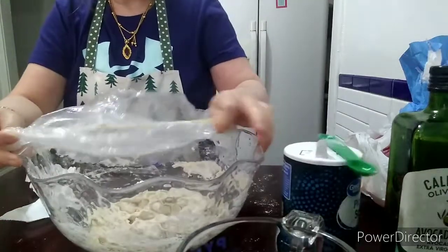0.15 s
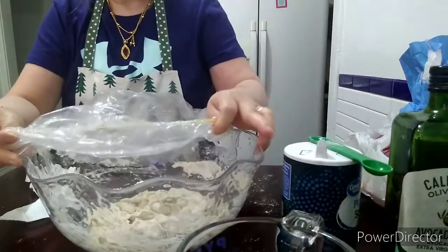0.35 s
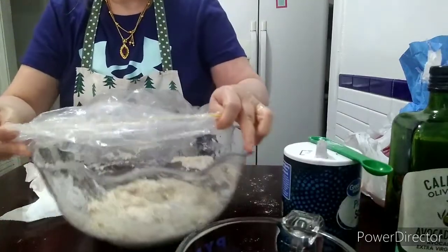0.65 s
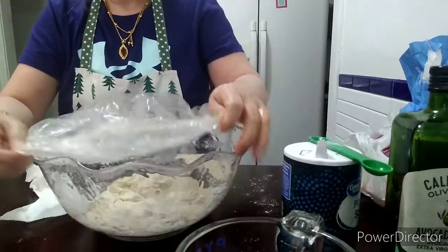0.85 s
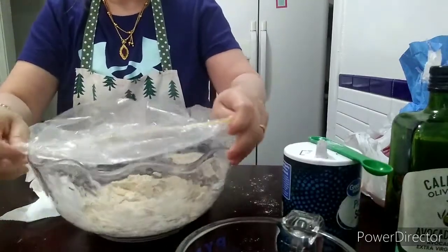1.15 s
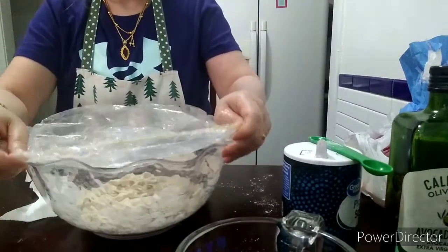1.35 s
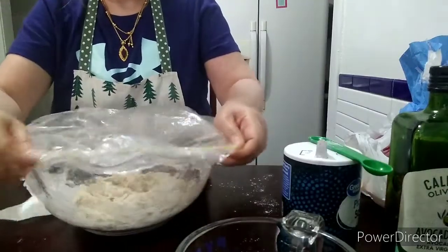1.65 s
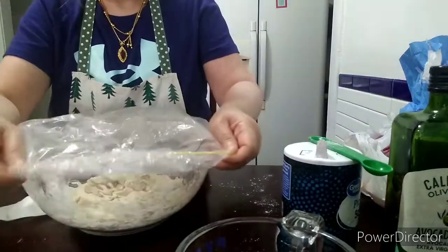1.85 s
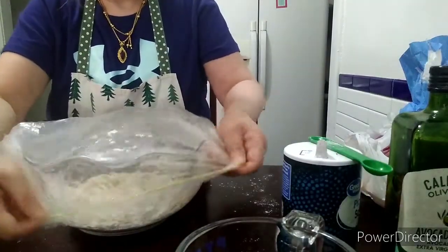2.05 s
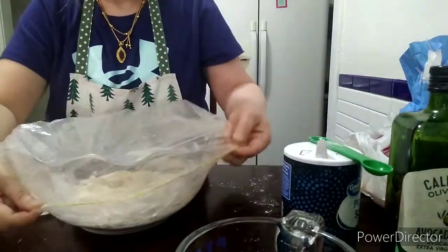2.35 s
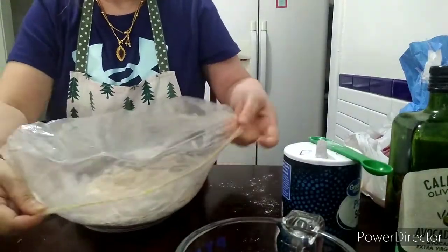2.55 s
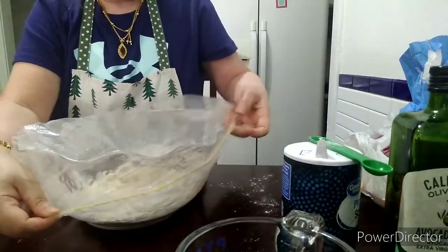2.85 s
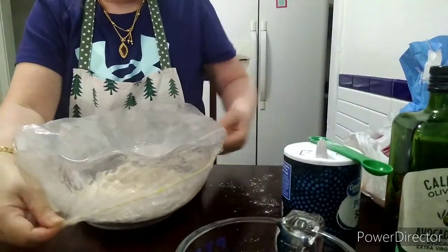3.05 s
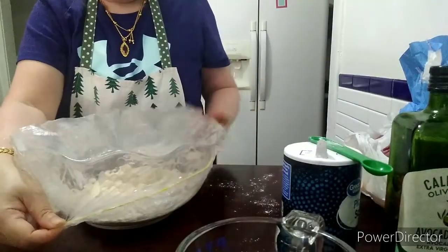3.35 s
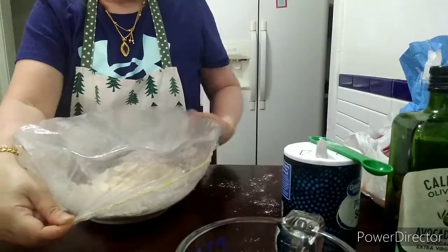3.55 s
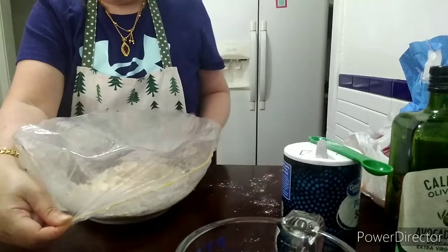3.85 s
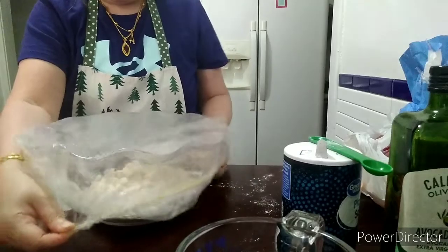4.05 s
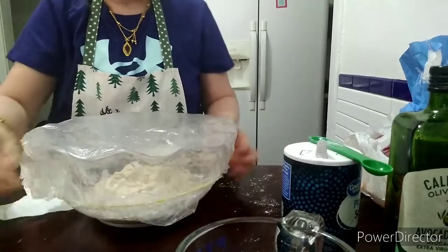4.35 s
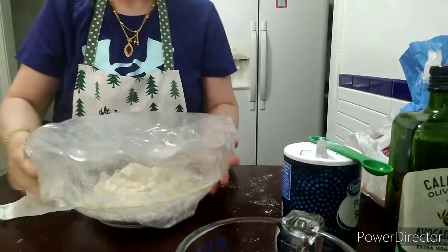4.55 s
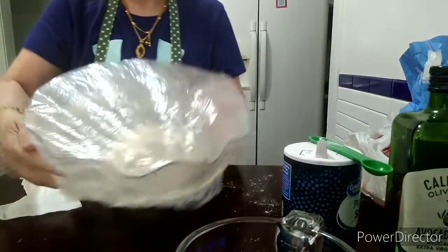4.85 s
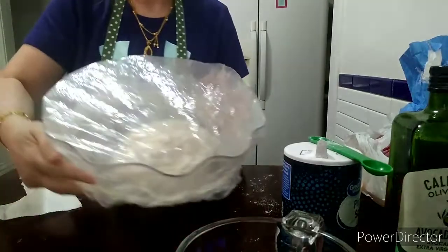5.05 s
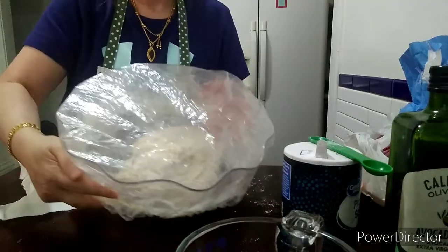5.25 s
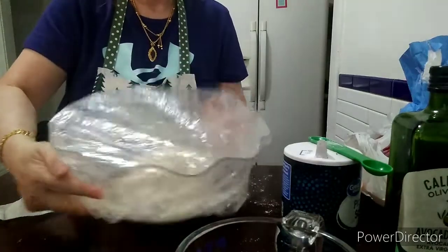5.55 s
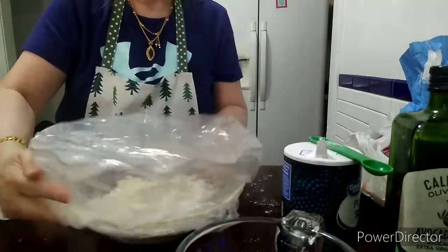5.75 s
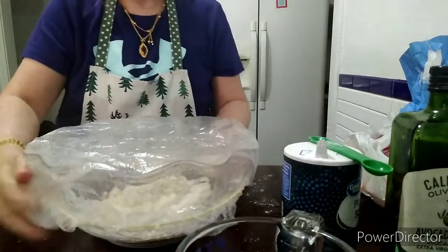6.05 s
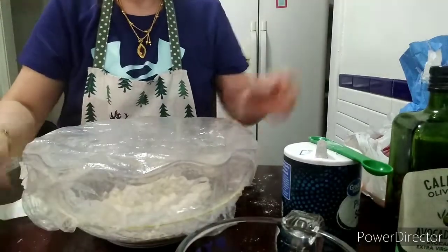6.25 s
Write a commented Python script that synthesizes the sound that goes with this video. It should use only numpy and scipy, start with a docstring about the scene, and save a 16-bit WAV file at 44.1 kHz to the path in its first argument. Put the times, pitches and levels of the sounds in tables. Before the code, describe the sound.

Thin plastic wrap crinkles as it is stretched over a bowl, which knocks loudly on a wooden table over a faint refrigerator hum.

```python
"""Cling film crackles as it is pulled over a big bowl of dough and smoothed round the rim.
Its tiny creases buckle and snap; it groans in short slips when drawn taut, peels off the rim in
rushes, squeaks, and hisses under the fingertips. The bowl is bumped, tipped and set down on a
wooden table with heavy, ringing knocks and dull scuffs.
The kitchen walls echo a little, and a refrigerator hums behind."""
import sys
import numpy as np
from scipy import signal
from scipy.fft import rfft, irfft, next_fast_len
from scipy.io import wavfile

SR = 44100
rng = np.random.default_rng(int(sys.argv[2]) if len(sys.argv) > 2 else 0)


def output_pcm(signal):
    """Save a mono or channel-first signal as 16-bit PCM at the path in sys.argv[1].

    Samples are clipped to [-1, 1] before scaling.
    """
    pcm = np.clip(np.atleast_2d(signal).T, -1, 1) * 32767
    wavfile.write(sys.argv[1], SR, np.round(pcm).astype(np.int16))


N = 282681
TIME = np.arange(N) / SR
CUTOFF_HZ = 15600


def from_db(db):
    """Turn decibels into a number to multiply by."""
    return 10 ** (np.asarray(db) / 20)


def rms_one(x):
    """Scale a sound so that its average strength (rms) is 1."""
    return x / np.sqrt(np.mean(x ** 2) + 1e-20)


def at_hz(points, hz):
    """Read between the rows of a frequency table, with octaves evenly spaced."""
    f, value = np.transpose(points)
    return np.interp(np.log(np.maximum(hz, 1)), np.log(f), value)


def coloured(x, spectrum):
    """Shape the tone of a sound with rows of f/Hz, gain/dB."""
    size = next_fast_len(N)
    hz = np.arange(size // 2 + 1) * SR / size
    return irfft(rfft(x, size) * from_db(at_hz(spectrum, hz)), size)[:N]


def band(x, low_hz, high_hz, order=2):
    """Keep the part of a sound between two frequencies."""
    sos = signal.butter(order, [low_hz, min(high_hz, SR / 2.1)], "band", fs=SR, output="sos")
    return signal.sosfilt(sos, x + 1e-18)


def drift(per_s):
    """A random wander around zero, about 1 in size."""
    knots = rng.standard_normal(size=4096)
    return np.interp(TIME * per_s, np.arange(len(knots)), knots) * np.sqrt(3 / 2)


def ring(clicks, hz, ring_s):
    """Each click starts a pure tone that fades by 60 dB in ring_s seconds."""
    decay, angle = from_db(-60 / (ring_s * SR)), 2 * np.pi * hz / SR
    return signal.lfilter([0, np.sin(angle)], [1, -2 * decay * np.cos(angle), decay ** 2], clicks + 1e-18)


def clicks_at(times, db):
    """Single clicks at the given times and levels."""
    out = np.zeros(N)
    out[np.round(np.asarray(times) * SR).astype(int)] = from_db(db)
    return out


def swell(s, rise, fall):
    """A loudness curve that climbs to 1 at time s and dies away."""
    out, near = np.zeros(N), slice(*np.searchsorted(TIME, [s - 10 * rise, s + 10 * fall]))
    out[near] = np.exp(-np.maximum((s - TIME[near]) / rise, (TIME[near] - s) / fall))
    return out


def bump(s, length):
    """A rounded hill of power around time s."""
    out, near = np.zeros(N), slice(*np.searchsorted(TIME, [s - 2 * length, s + 2 * length]))
    out[near] = np.exp(-(2 * (TIME[near] - s) / length) ** 2)
    return out


# hum of the motor and the mains: f/Hz, level/dB
HUM_TONES = [(114, -49), (120, -61)]
# tone of the fan and the room air: f/Hz, gain/dB
AIR_COLOUR = [(30, -11), (60, 1), (85, 9), (112, 10), (170, 2), (230, 5.5), (385, 2), (460, -16.5),
              (560, -15.5), (680, -33), (1100, -34), (4000, -81), (12000, -75.5)]

def refrigerator(air_db=-51.5, waver_db=3.5):
    """The motor and the mains make two wavering hums over a low rush of air."""
    hum = np.zeros(N)
    for hz, db in HUM_TONES:
        height = np.sqrt(2) * from_db(db + waver_db * drift(10))
        hum += height * np.sin(2 * np.pi * (hz * TIME + rng.random()))
    air = coloured(band(rng.standard_normal(N), 48, 16000), AIR_COLOUR)
    return hum + from_db(air_db) * rms_one(air)


# how long the echo takes to fade by 60 dB: f/Hz, fade/s
ECHO_FADE = [(300, 0.35), (800, 0.5), (3000, 0.47), (12000, 0.28)]
# how alike the echo is on the left and right: f/Hz, likeness (0 to 1)
ECHO_LIKENESS = [(500, 0.9), (1500, 0.92), (4000, 0.08), (10000, 0)]

def reflections(count, first_echo_s=0.0066):
    """Random patterns of wall echoes; the highs die sooner and differ between left and right."""
    t, edges = np.arange(SR // 2) / SR, np.geomspace(180, 16000, 8)
    tails = np.zeros((count, 2, len(t)))
    for low, high in zip(edges, edges[1:]):
        hz = np.sqrt(low * high)
        alike = at_hz(ECHO_LIKENESS, hz)
        left, other = band(rng.standard_normal((2, count, len(t))), low, high)
        right = alike * left + np.sqrt(1 - alike ** 2) * other
        tails += np.stack([left, right], axis=1) * from_db(-60 * t / at_hz(ECHO_FADE, hz))
    tails *= t > first_echo_s
    return tails / np.sqrt(np.sum(tails[:, 0] ** 2) / count)


def kitchen(x, count=17):
    """Hands and bowl keep moving, so one pattern of echoes fades into the next."""
    hop = N // (count - 1) + 1
    x, fade = np.pad(x, (hop, 2 * hop)), signal.windows.cosine(2 * hop)
    out = np.zeros((2, len(x) + SR))
    for start, pattern in zip(hop * np.arange(count), reflections(count)):
        piece = fade * x[start:start + 2 * hop]
        echo = signal.fftconvolve(piece[None], pattern, axes=1)
        out[:, start:start + echo.shape[1]] += echo
    return out[:, hop:hop + N]


# the bowl shifts on the table: middle t/s, level/dB, length/s
BOWL_SCUFFS = [(0.055, -48.5, 0.075), (0.727, -53, 0.14), (3.27, -39.5, 0.039), (3.463, -40, 0.023),
               (3.511, -31, 0.021), (3.736, -37.5, 0.034), (4.762, -60, 0.093), (5.676, -52, 0.12)]
# tone of the scuffing: f/Hz, gain/dB
SCUFF_COLOUR = [(150, 2.5), (280, 3), (500, 4.5), (750, -14), (1200, -41.5)]

def scuffs(catches_per_s=400):
    """The foot of the bowl scrapes over the wood in a dull run of tiny catches."""
    power = sum(from_db(db) ** 2 * bump(s, length) for s, db, length in BOWL_SCUFFS)
    catches = (rng.random(N) < catches_per_s / SR) * rng.standard_normal(N)
    return np.sqrt(power) * rms_one(coloured(band(catches, 140, 1500), SCUFF_COLOUR))


def thud(s, hz, cycles=7.3, sag=0.15, settle_s=0.024):
    """A short, low tone whose pitch sinks as the bowl settles on the wood."""
    t = np.clip(TIME - s, 0, .2)
    turns = hz * ((1 - sag / 2) * t + sag * settle_s * (1 - np.exp(-t / settle_s)))
    return np.sin(2 * np.pi * turns) * from_db(-60 * t * hz / cycles)


def crack(times, levels_db, click_db=19, grit_db=-6):
    """Bowl meets wood with one sharp click and a little gritty noise after it."""
    grit = sum(from_db(db + grit_db) * swell(s + 0.0011, rise=0.000067, fall=0.0058)
               for s, db in zip(times, levels_db))
    contact = clicks_at(times, levels_db + click_db) + 2 * grit * rng.standard_normal(N)
    colour = [(750, 13.5), (1200, -5.5), (2000, 3.5), (2600, 0), (3500, -6), (4200, -9),
              (5500, -12.5), (8000, -37.5)]
    return coloured(band(contact, 470, 11000), colour)


# tone of the shaking table and bowl: f/Hz, gain/dB
SHAKE_COLOUR = [(140, 13.5), (300, 3), (650, -2.5), (1100, -13), (1900, -25.5), (3200, -20.5), (5000, -35)]

def shudder(times, levels_db, rise_s=0.0022, fall_s=0.029):
    """The many weak notes of table and bowl blur into a dull noise after each knock."""
    shaking = sum(from_db(db) * swell(s + 2 * rise_s, rise_s, fall_s) * (TIME > s)
                  for s, db in zip(times, levels_db))
    return shaking * rms_one(coloured(band(rng.standard_normal(N), 120, 4600), SHAKE_COLOUR))


# the bowl hits the table: t/s, strength/dB, thud f/Hz, weight behind it/dB, hardness/dB
BOWL_KNOCKS = [(1.117, -5.5, 410, -2, 12.5), (1.1254, -11, 400, -17, 6), (2.541, -21, 417, -10.5, -21),
               (3.006, -20, 427, -11, 8), (3.042, -13, 507, -14, 6.5), (3.406, -27.5, 390, -11, 6),
               (3.510, -13.5, 440, -9, 6.5), (3.718, -27.5, 577, -6, 7.5), (3.756, -23, 380, -5.5, 6),
               (3.951, -27.5, 446, -9, 6), (5.835, -7.5, 524, 2, 7.5), (5.843, -6.5, 210, -8.5, -20),
               (6.0534, -4, 430, -5, 2), (6.061, -10.5, 310, -37, -18)]
# notes that bowl and table ring at: f/Hz, relative level/dB, ring time/s
BOWL_NOTES = [(122.4, -8, 0.4), (154.5, -9.5, 0.2), (191, -31, 0.12), (210, -12, 0.21), (286, -15.5, 0.38),
              (346.7, -16.5, 0.14), (387, -30, 0.1), (495, -29, 0.1), (543, -20.5, 0.35), (694, -33, 0.06),
              (850, -30, 0.27), (1107, -27, 0.081), (1390, -30.5, 0.03), (3380, -35.5, .08)]

def knocks(body_lag_s=0.00113, boom_below_hz=170, vary_db=1.5, crack_db=-21.5, shudder_db=-21):
    """Each knock is a crack, a thud, then ringing notes; the lowest are the boom of the table."""
    times, blow_db, thud_hz, weight_db, hardness_db = np.transpose(BOWL_KNOCKS)
    boom_db = blow_db + weight_db
    ring_db = blow_db - 3.5 + 0.62 * weight_db   # weight matters less to the higher notes
    chance_db = vary_db * rng.standard_normal((len(times), len(BOWL_NOTES)))
    body = np.zeros(N)
    for k, (hz, db, ring_s) in enumerate(BOWL_NOTES):
        strength_db = boom_db if hz < boom_below_hz else ring_db + chance_db[:, k]
        body += (-1) ** k * ring(clicks_at(times + body_lag_s, strength_db + db), hz, ring_s)
    for s, db, hz in zip(times, blow_db, thud_hz):
        body += from_db(db) * thud(s + body_lag_s, hz)
    body = band(body, 61, 2700, order=3)   # the table gives off no deep bass
    return body + crack(times, blow_db + crack_db + hardness_db) + shudder(times, blow_db + shudder_db)


# fingertips slide over the film: middle t/s, level/dB, length/s
FINGER_SLIDES = [(5.27, -78.5, 0.11), (5.349, -64.5, 0.026), (5.405, -69.5, 0.049), (5.483, -87, 0.085),
                 (5.585, -72, 0.06)]
# tone of their hiss: f/Hz, gain/dB
HISS_COLOUR = [(3000, -22), (5400, -15.5), (8500, -31), (10400, -10), (11300, 6), (12500, -6), (14500, -18)]

def slides():
    """Fingertips on the stretched film make a thin hiss that swells and fades."""
    power = sum(from_db(db) ** 2 * bump(s, length) for s, db, length in FINGER_SLIDES)
    hiss = coloured(band(rng.standard_normal(N), 2500, CUTOFF_HZ), HISS_COLOUR)
    return np.sqrt(power) * rms_one(hiss)


# the film squeaks on the rim: t/s, f/Hz, level/dB, fade/s, tremble (share of the pitch)
RIM_SQUEAKS = [(2.223, 2880, -37, .004, .03), (2.25, 2875, -33, 0.0063, 0.019),
               (3.287, 1133, -43, 0.021, 0.17), (4.34, 1186, -42, 0.039, 0.1885),
               (4.422, 1147, -48.5, 0.019, .08), (5.606, 915, -56, 0.015, 0.14)]

def squeaks(trembles_per_s=600):
    """The film sticks and slips on the rim, making a brief tone with a trembling pitch."""
    out = np.zeros(N)
    for s, hz, db, fade, tremble in RIM_SQUEAKS:
        pitch = hz * (1 + tremble * drift(trembles_per_s))
        phase = 2 * np.pi * np.cumsum(pitch) / SR
        out += np.sqrt(2) * from_db(db) * swell(s, fade / 2, fade) * np.sin(phase)
    return out


# the film is dragged over the rim: start t/s, strength/dB, length/s, brightness/(dB per octave)
FILM_PULLS = [(0.167, -38, .04, -6), (0.227, -30.5, .004, -7), (0.2395, -24, .026, 2.5),
              (0.279, -27.5, .014, 5), (0.308, -43, .02, -7), (0.337, -30.5, .008, -2),
              (0.358, -37, .022, 3), (0.428, -41, .018, 3.5), (0.479, -54.5, .022, -19.5),
              (0.765, -39.5, .035, -2), (2.352, -41, .025, -8), (3.484, -39, .02, 2)]
# notes that the tight film rings at: f/Hz, relative level/dB, ring time/s
FILM_NOTES = [(203, -7, 0.078), (278, -13.5, 0.12), (456, -3.5, 0.027), (734, -15, 0.068),
              (1330, -26.5, 0.022), (1470, -20.5, 0.013)]

def groans(slips_per_s=240, unevenness=.14, pivot_hz=460, detune=.03):
    """Each pull is a quick run of slips that ring the film; its tightness sets the pitch."""
    out = np.zeros(N)
    for start, pull_db, length, tilt_db in FILM_PULLS:
        gaps = np.exp(unevenness * rng.standard_normal(24)) / slips_per_s
        delays = np.cumsum(gaps) - gaps[0]
        slips = clicks_at(start + delays[delays <= length], pull_db)
        tuning = np.exp(detune * rng.standard_normal())
        for hz, db, ring_s in FILM_NOTES:
            out += from_db(db + tilt_db * np.log2(hz / pivot_hz)) * ring(slips, hz * tuning, ring_s)
    return band(out, 84, 3600)


# one flat patch of film flips over: t/s, f/Hz, level/dB, fade/s
FILM_TICKS = [(0.0206, 9200, -38, 0.00079), (0.269, 9000, -36, .001), (0.5008, 10000, -45, 0.0012),
              (0.8186, 10050, -39, .0008), (1.0105, 11000, -45, .0008), (1.284, 10000, -34, .0007),
              (1.934, 10100, -34, 0.00087), (2.513, 6000, -33, .001), (2.628, 8040, -33, 0.0011),
              (2.7305, 9000, -45, .001), (2.996, 9000, -39, 0.00084), (3.189, 9000, -36, 0.0011),
              (3.2585, 5000, -40, 0.0011), (4.675, 9000, -37, .001), (4.998, 8900, -52, 0.00086),
              (5.058, 4730, -40, 0.001), (5.082, 10500, -35, 0.001), (5.141, 11100, -48, 0.0013),
              (5.303, 3530, -50.5, 0.0038), (5.389, 5200, -61.5, 0.0058), (5.3895, 12500, -56, .004),
              (6.38, 10900, -50, 0.0013)]

def ticks(width_ratio=1.28):
    """A flipping patch gives a sharp burst of noise around its own pitch."""
    out, t = np.zeros(N + SR), TIME[:SR // 20]
    for s, hz, db, fade in FILM_TICKS:
        noise = band(rng.standard_normal(len(t)), hz / width_ratio, hz * width_ratio, order=4)
        start = int(s * SR)
        out[start:start + len(t)] += from_db(db) * rms_one(noise) * np.exp(-t / fade)
    return out[:N]


# tone of the crackling film: f/Hz, gain/dB
CRACKLE_COLOUR = [(200, 7), (330, -4.5), (480, 1.5), (750, -8.5), (1100, -10), (1800, -8), (2100, -7.5),
                  (2350, -5.5), (3100, -8.5), (4100, -8), (5200, -11.5), (6200, -12), (7200, -16),
                  (8600, -16), (10300, -12.5), (11500, -6.5), (14000, -13.5), (15500, -16)]

def film_tone(x):
    """Give a sound the tone of the film, at an average strength of 1."""
    return rms_one(coloured(x, CRACKLE_COLOUR))


def pops(rub_power, per_s=110, gain_db=-9, spread_db=3.0, cycles=10, count=28):
    """Larger patches pop at random among the fine creases; each rings briefly at its own pitch."""
    happens = rng.random(N) < per_s / SR
    sizes = happens * from_db(spread_db * np.minimum(rng.exponential(1, N), 3))
    pitches, choice = np.geomspace(1000, 14500, count), rng.integers(0, count, N)
    ringing = sum(hz * ring(sizes * (choice == k), hz, cycles / hz) for k, hz in enumerate(pitches))
    return from_db(gain_db) * np.sqrt(rub_power) * film_tone(ringing)


def creases(per_s, idle_per_s=3500, spread_db=1.5, clump_db=0.78, clumps_per_s=130):
    """Tiny creases buckle at random moments, in snaps of uneven size that come in soft clumps."""
    chance = np.clip((per_s + idle_per_s) / SR, 1 / SR, 1)
    happens = rng.random(N) < chance
    size_db = spread_db * np.minimum(rng.exponential(1, N), 5) + clump_db * drift(clumps_per_s)
    return happens / np.sqrt(chance) * from_db(size_db)


def crinkle(snaps, low_hz, high_hz, flicker_db=2.5, flickers_per_s=110):
    """Creases of different sizes take turns, so four parts of the range each flicker on their own."""
    snaps = snaps * rng.standard_normal(N)
    edges = np.geomspace(low_hz, high_hz, 5)
    parts = [band(snaps * rng.choice([-1, 1], N), low, high, order=3)
             for low, high in zip(edges, edges[1:])]
    return film_tone(sum(part * from_db(flicker_db * drift(flickers_per_s)) for part in parts))


# how firmly the hands work the film, as its steady crackle: t/s, level/dB
HAND_GRIP = [(0, -53.5), (0.1, -61), (0.36, -54.5), (0.45, -72.5), (0.66, -67.5), (0.77, -52), (1.15, -53),
             (1.64, -51.5), (1.72, -55.5), (2.05, -49.5), (2.56, -55.5), (2.7, -57), (3.35, -57.5),
             (3.82, -57), (5.03, -57.5), (5.21, -85.5), (6.02, -81), (6.1, -62.5), (6.33, -65)]
# a hand smooths the film down: middle t/s, level/dB, length/s, share for the loose folds/dB
HAND_STROKES = [(0.254, -49.5, 0.13, 1), (0.866, -58, 0.11, 3), (0.999, -46, 0.034, -5),
                (1.627, -55, 0.041, -7), (1.816, -46, 0.068, -0.5), (2.195, -42, 0.11, -1),
                (2.363, -44.5, 0.044, -1), (2.46, -46, 0.15, -6), (2.878, -51.5, 0.18, 1.5),
                (2.989, -46, 0.076, -2), (3.072, -42.5, 0.079, -1.5), (3.196, -47, 0.079, 0),
                (3.267, -42.5, 0.027, -3), (3.417, -50.5, 0.071, -1), (3.592, -57.5, 0.046, 4),
                (3.672, -50.5, 0.091, 0.5), (3.922, -51, 0.087, -1), (4.028, -48, 0.057, 1.5),
                (4.125, -42.5, 0.11, -1.5), (4.252, -48.5, 0.11, -2), (4.564, -50, 0.16, -1),
                (4.726, -48, 0.07, -1), (4.949, -54.5, 0.075, -5), (5.068, -63, 0.13, -25),
                (5.634, -71.5, 0.037, -10), (5.698, -55.5, 0.068, 0), (5.785, -63, 0.23, 3),
                (6.185, -49, 0.05, -6.5), (6.228, -46.5, 0.059, 0)]

def rubbing():
    """Power the hands put into fine creases and loose folds: a steady grip plus each stroke."""
    grip_db = np.interp(TIME, *np.transpose(HAND_GRIP))
    fine = folds = from_db(grip_db) ** 2
    for s, db, length, folds_db in HAND_STROKES:
        stroke = from_db(db) ** 2 * bump(s, length)
        fine = fine + stroke
        folds = folds + stroke * from_db(folds_db) ** 2
    return fine, folds


# the film peels off the rim in a rush: peak t/s, level/dB, fade/s
RIM_PEELS = [(2.177, -30.5, 0.014), (2.541, -28.5, 0.0052), (3.496, -37, 0.031), (4.302, -29.5, 0.0078)]
# a stuck crease lets go all at once: t/s, level/dB, fade/s
FREED_CREASES = [(0.019, -41, 0.0035), (0.245, -35, 0.0025), (0.258, -44, 0.0038), (0.286, -39.5, 0.0035),
                 (0.502, -56, 0.033), (0.687, -48, 0.0063), (2.35, -42, 0.0067), (2.996, -41, 0.008),
                 (3.042, -58, 0.009), (3.26, -43.5, 0.027), (3.714, -40, 0.023), (4.322, -23, 0.0028),
                 (4.461, -41.5, 0.0093), (5.068, -51.5, 0.0069), (5.835, -46.5, .004), (6.295, -40, 0.0094)]

def film(usual_db=-50, snaps_per_s=6000, fold_db=-0.16, flutter_db=-1, peel_fold_db=-3,
         peel_flutter_db=-9):
    """The same tiny snaps make a high crackle, a crumpling of folds and a low flutter of the sheet."""
    rub_power, folds = rubbing()
    usual_power = from_db(usual_db) ** 2
    bulk = usual_power * (folds / usual_power) ** 1.17   # firmer hands catch larger folds
    peel = sum((from_db(db) * swell(s, 0.45 * fade, fade)) ** 2 for s, db, fade in RIM_PEELS)
    crackle_power = rub_power + peel
    fold_power = bulk * from_db(fold_db) ** 2 + peel * from_db(peel_fold_db) ** 2
    flutter_power = bulk * from_db(flutter_db) ** 2 + peel * from_db(peel_flutter_db) ** 2
    for s, db, fade in FREED_CREASES:
        rush = (from_db(db) * swell(s, rise=0.0002, fall=fade)) ** 2
        share_db = min(-2 + 0.3 * (db + 41.5), 0)   # a louder crease moves more of the folds
        crackle_power += rush
        fold_power += rush * from_db(share_db) ** 2
    # harder handling makes more snaps, up to a tearing hiss in a peel
    snaps = creases(snaps_per_s * (crackle_power / usual_power) ** 0.6)
    crackle = np.sqrt(crackle_power) * crinkle(snaps, 4970, CUTOFF_HZ)
    crumple = np.sqrt(fold_power) * crinkle(snaps, 580, 4900)
    flutter = np.sqrt(flutter_power) * crinkle(snaps, 202, 1140)
    return crackle + crumple + flutter + pops(rub_power)


def scene(film_echo_db=-6.5, bowl_echo_db=-11, squeak_echo_db=-11):
    """Film, bowl, kitchen echo and refrigerator, heard from just across the table."""
    wrap = film() + ticks() + groans() + slides()
    squeak = squeaks()
    bowl = knocks() + scuffs()
    echo = kitchen(from_db(film_echo_db) * wrap + from_db(squeak_echo_db) * squeak
                   + from_db(bowl_echo_db) * band(bowl, 210, 12000))
    return wrap + squeak + bowl + echo + refrigerator()


def record(dry):
    """The right side is weaker, duller, a little late and flipped in sign; both lose the very top."""
    lag_samples = 21
    late = np.pad(dry[1], (lag_samples, 0))[:N]
    dulling = [(100, -5.5), (2200, -5.0), (4500, -7.5), (8500, -8.5), (10500, -15.5),
               (12500, -26.0), (15500, -21.0)]
    right = -coloured(late, dulling)
    top_cut = signal.ellip(10, .1, 85, CUTOFF_HZ, fs=SR, output="sos")
    return signal.sosfilt(top_cut, np.array([dry[0], right]))


dry = scene()
out = record(dry)
output_pcm(out)
```